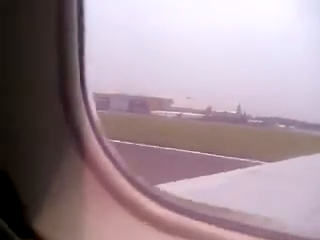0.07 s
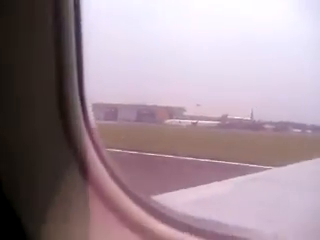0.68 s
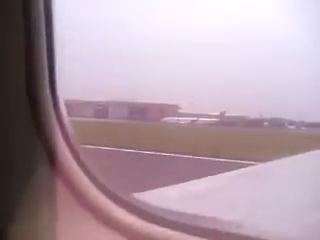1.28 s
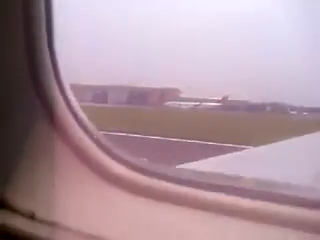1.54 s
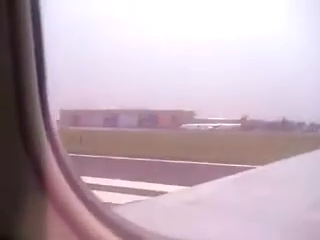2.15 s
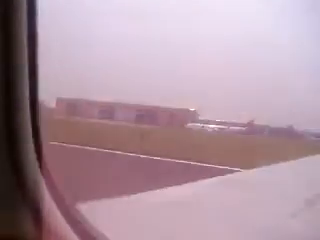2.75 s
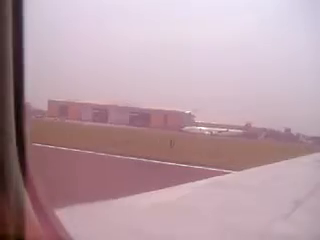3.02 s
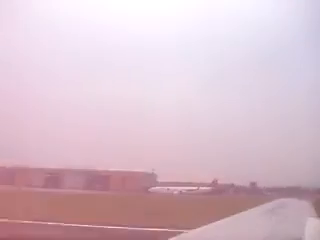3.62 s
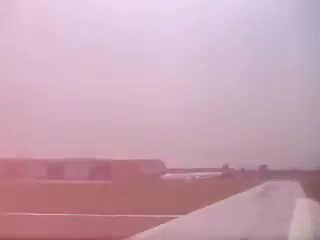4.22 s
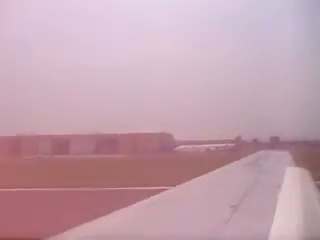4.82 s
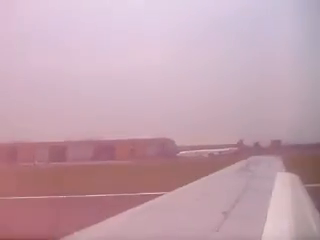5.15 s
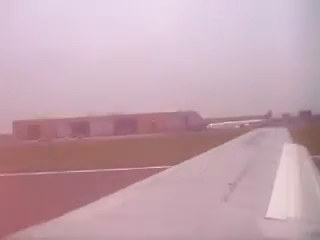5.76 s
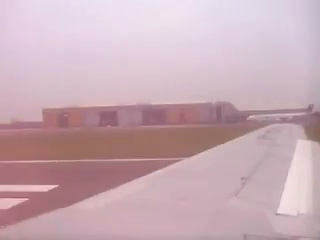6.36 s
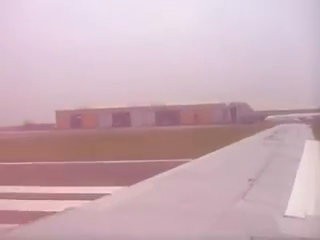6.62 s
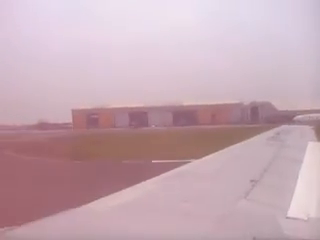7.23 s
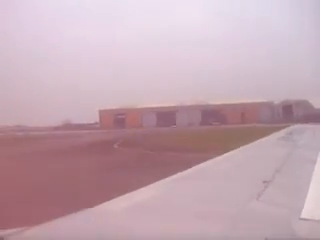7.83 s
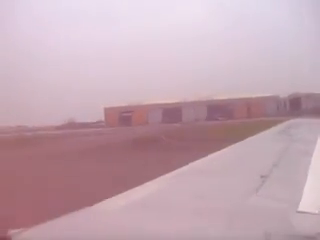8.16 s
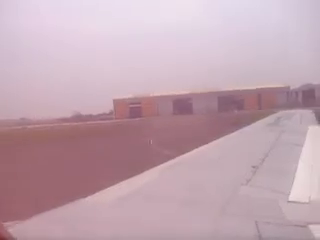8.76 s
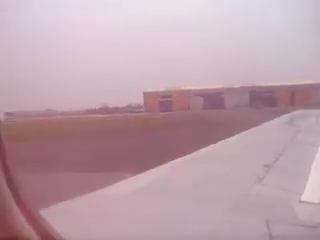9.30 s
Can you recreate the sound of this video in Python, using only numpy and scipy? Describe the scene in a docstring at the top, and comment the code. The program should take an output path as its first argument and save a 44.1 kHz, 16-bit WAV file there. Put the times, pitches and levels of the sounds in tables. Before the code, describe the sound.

Inside a taxiing airliner, a steady engine rumble fills the cabin along with rushing air and a thin, high turbine whine. About three seconds in, the whine and its hiss fall to a faint trace while the rush grows slightly. Short, dull jolts of the airframe come irregularly, each making the sound dip briefly, and one faint tick comes late. A small microphone at a window seat gives a muffled, narrow sound.

```python
"""Inside a taxiing airliner, heard by a small narrow-band camera at a window seat.
Steady engine rumble fills the cabin. As the camera turns to the window, the turbine whine
and its hiss fall away and the rush of exhaust and air grows.
Rumble and rush swell before each jolt of the airframe; the jolt trips the camera's limiter,
so the sound ducks and creeps back. One faint tick comes late."""
import sys
import numpy as np
from scipy import signal
from scipy.fft import rfft, irfft
from scipy.io import wavfile
from scipy.ndimage import uniform_filter1d, minimum_filter1d

SR = 44100
rng = np.random.default_rng(int(sys.argv[2]) if len(sys.argv) > 2 else 0)


def persist_wave(psi):
    """Save psi, clipped to +-1, as 16-bit WAV."""
    counts = np.round(np.clip(psi, -1, 1) * 32767).astype(np.int16)
    wavfile.write(sys.argv[1], SR, np.atleast_2d(counts).T)


N = 418068

# Cabin air resonances. Each row: centre in Hz, width in Hz, lift in dB.
CABIN_MODES = [(198, 20, 2.5), (247.5, 9.8, 4.5), (306, 20, 4.5), (364, 28, 3), (504.7, 25, 3),
               (584.6, 64, 2), (667.7, 34, 3.5), (783, 27, 4)]
# Turbine whine at the camera. Each row: time in seconds, level in dB.
WHINE_LEVELS = [(0, -30), (1.45, -25.5), (1.9, -29.5), (2.82, -33), (2.95, -45), (3.45, -56.5), (3.7, -48),
                (4.6, -39.5), (4.95, -52), (5.3, -46), (6, -60.5), (9.48, -54.5)]
# Airframe jolts. Each row: time in seconds, peak in dB before the limiter.
JOLTS = [(.177, 1), (1.06, -1), (1.669, -2), (2.282, -0.5), (2.852, 3.5), (4.211, -.5), (4.85, 0),
         (5.664, 2.5), (6.816, -2), (7.685, 1), (8.201, 2), (8.892, -3.5), (9.116, 3.5)]
TURN_MID_S, TURN_LENGTH_S = 2.89, 0.2


def gain_of(db):
    """Decibels to amplitude."""
    return 10 ** (np.asarray(db) / 20)


def unit_rms(x):
    """Scale to rms 1."""
    return x / np.sqrt(np.mean(x ** 2) + 1e-20)


def clock():
    """Sample times in seconds."""
    return np.arange(N) / SR


def curve(rows):
    """Straight lines through (seconds, value) points."""
    return np.interp(clock(), *np.transpose(rows))


def ease(start_s, length_s):
    """Smooth step from 0 to 1."""
    return np.sin(np.pi / 2 * np.clip((clock() - start_s) / length_s, 0, 1)) ** 2


def camera_turn():
    """Progress of the turn to the window, 0 to 1."""
    return ease(TURN_MID_S - TURN_LENGTH_S / 2, TURN_LENGTH_S)


def noise(spectrum, modes=()):
    """Unit-rms noise with a smooth spectrum, lifted at each resonance."""
    hz = np.fft.rfftfreq(N, 1 / SR)
    points_hz, points_db = np.transpose(spectrum)
    shape_db = np.interp(np.log(hz + 1), np.log(points_hz), points_db)
    for centre_hz, width_hz, lift_db in modes:
        shape_db += lift_db / (1 + (2 * (hz - centre_hz) / width_hz) ** 2)
    return unit_rms(irfft(rfft(rng.standard_normal(N)) * gain_of(shape_db), N))


def drift(rate_hz):
    """Unit-rms random drift, rolling off above rate_hz."""
    hz = np.fft.rfftfreq(N, 1 / SR)
    return unit_rms(irfft(rfft(rng.standard_normal(N)) / (1 + (hz / rate_hz) ** 2), N))


def low_pass(x, hz):
    """Steep zero-delay low-pass."""
    taps = signal.firwin(255, hz, window=("kaiser", 8), fs=SR)
    return signal.oaconvolve(x, taps, "same")


def swell(height_db, lead_s, width_s):
    """Gain hump ahead of each jolt, scaled by its strength; height_db is for a 0 dB jolt."""
    t = clock()
    humps = sum(gain_of(db) * np.exp(-((t - at_s + lead_s) / width_s) ** 2) for at_s, db in JOLTS)
    return gain_of(height_db * humps)


def engine_rumble(base_db=-16.5, rise_db_per_s=0.0128):
    """Engine rumble rings in the cabin air, rising slowly as the aircraft rolls on."""
    # Each row: frequency in Hz, relative density in dB.
    spectrum = [(15, -37.5), (32, -29.5), (55, -24.5), (105, -19.5), (150, -10.5), (195, -1.5), (300, -0.5),
                (380, -1), (430, -9), (600, -13.5), (800, -26.5), (1500, -58.5)]
    gain = gain_of(base_db + rise_db_per_s * clock()) * swell(height_db=1.57, lead_s=0.096, width_s=0.27)
    return gain * noise(spectrum, CABIN_MODES)


def exhaust_rush(base_db=-25.5, turn_db=2, closing_s=1.0):
    """Exhaust and air through the fuselage, growing as the camera closes in on the pane."""
    # Each row: frequency in Hz, relative density in dB.
    spectrum = [(200, -28.5), (380, -4), (450, 0), (540, -1), (640, -11.5), (740, -14), (900, -14.5),
                (1100, -20), (1600, -23), (2100, -26.5), (2700, -30), (3200, -29), (3500, -39), (4100, -58)]
    return gain_of(base_db + turn_db * ease(TURN_MID_S, closing_s)) * noise(spectrum, CABIN_MODES)


def blade_hiss(base_db=-30.5, turn_db=-8.5, db_per_whine_db=0.33):
    """Broadband turbine blade noise, humped around the whine and following its level."""
    # Each row: frequency in Hz, relative density in dB.
    spectrum = [(700, -24), (1050, -8.5), (1300, -7.5), (1700, -7), (1950, -8), (2180, -6), (2310, -3),
                (2410, -4.5), (2550, -13), (2900, -16), (3300, -27), (4000, -44.5)]
    whine_db = curve(WHINE_LEVELS)
    follow_db = db_per_whine_db * (whine_db - whine_db.max())
    return gain_of(base_db + follow_db + turn_db * camera_turn()) * noise(spectrum)


def flicker(x, shared_db=1.25, patch_db=1.9, full_above_hz=900):
    """The treble flickers, as a whole and in patches a few hundred Hz wide."""
    hz, _, frames = signal.stft(x, SR, nperseg=512, noverlap=384)
    shared = unit_rms(uniform_filter1d(rng.standard_normal(frames.shape[1]), size=5))
    patches = uniform_filter1d(rng.standard_normal(frames.shape), size=6, axis=1)
    patches = unit_rms(uniform_filter1d(patches, size=4, axis=0))
    treble = np.minimum(hz / full_above_hz, 1)[:, None] ** 2
    frames *= gain_of(treble * (shared_db * shared + patch_db * patches))
    return signal.istft(frames, nperseg=512, noverlap=384)[1][:N]


def airflow(air, rise_db_per_s=0.16):
    """Rush and hiss swell and flicker together, rising as the aircraft rolls on."""
    gain = gain_of(rise_db_per_s * clock()) * swell(height_db=1.5, lead_s=0.04, width_s=0.05)
    return gain * flicker(air)


def shaft_tone(hz, wander_hz, flutter_hz, flutter_db=2.0):
    """Unit-rms tone; pitch wanders and level flutters in the turbulent intake air."""
    cycles = np.cumsum(hz + wander_hz * drift(2.7)) / SR
    return unit_rms(np.sin(2 * np.pi * cycles) * gain_of(flutter_db * drift(flutter_hz)))


def turbine_whine(hz=2308.3, scatter_hz=28, share_before=0.044, share_after=0.49):
    """Blade whine, part clean, part scattered by turbulence; the turn raises the scattered share."""
    clean = shaft_tone(hz, wander_hz=0.3, flutter_hz=52)
    carrier = np.exp(2j * np.pi * hz * clock())
    scattered = unit_rms((carrier * (drift(scatter_hz) + 1j * drift(scatter_hz))).real)
    share = share_before + (share_after - share_before) * camera_turn()
    return gain_of(curve(WHINE_LEVELS)) * (np.sqrt(1 - share) * clean + np.sqrt(share) * scattered)


def spool(base_db=-44, turn_db=-8):
    """Faint lower tone of the spool, dropping with the turn."""
    gain = gain_of(base_db + turn_db * camera_turn())
    return gain * shaft_tone(hz=877.3, wander_hz=0.6, flutter_hz=4.7)


def airframe_jolts(pitch_hz=360):
    """Each jolt is one dull, heavily damped swing of pressure."""
    t, pressure = clock(), np.zeros(N)
    for at_s, peak_db in JOLTS:
        near = abs(t - at_s) < 2 / pitch_hz
        phase_sq = (np.pi * pitch_hz * (t[near] - at_s)) ** 2
        pressure[near] += gain_of(peak_db) * (1 - 2 * phase_sq) * np.exp(-phase_sq)
    return pressure


def limiter(x, ceiling_db=-4.5, recovery_s=0.69):
    """A peak over the ceiling pulls the gain down just ahead of it; recovery is slow."""
    over_db = np.maximum(20 * np.log10(abs(x) + 1e-9) - ceiling_db, 0)
    release = np.exp(-clock() / recovery_s)
    held_db = np.maximum.accumulate(over_db / release) * release
    lookahead_db = minimum_filter1d(-held_db, size=161)
    return x * gain_of(uniform_filter1d(lookahead_db, size=81))


def tick(start_s=7.622, level_db=-10, decay_s=0.00028):
    """One faint, sharp tick."""
    age_s = clock() - start_s
    return gain_of(level_db) * (age_s >= 0) * np.exp(-abs(age_s) / decay_s)


def scene():
    """Engines and jolts at the seat, mono."""
    air = exhaust_rush() + blade_hiss()
    return (engine_rumble() + airflow(air) + turbine_whine() + spool() + airframe_jolts())[None]


def record(dry, low_cut_hz=40, band_top_hz=4150, tick_top_hz=15800):
    """Camera limiter and telephone-like band; only the tick reaches higher."""
    low_cut = signal.butter(2, low_cut_hz, "highpass", fs=SR, output="sos")
    narrow = low_pass(signal.sosfilt(low_cut, limiter(dry[0])), band_top_hz)
    return low_pass(narrow + tick(), tick_top_hz)[None]


dry = scene()
out = record(dry)
persist_wave(out)
```